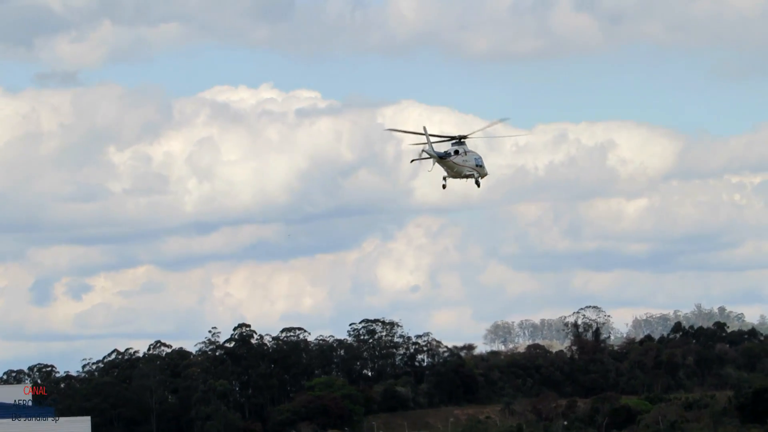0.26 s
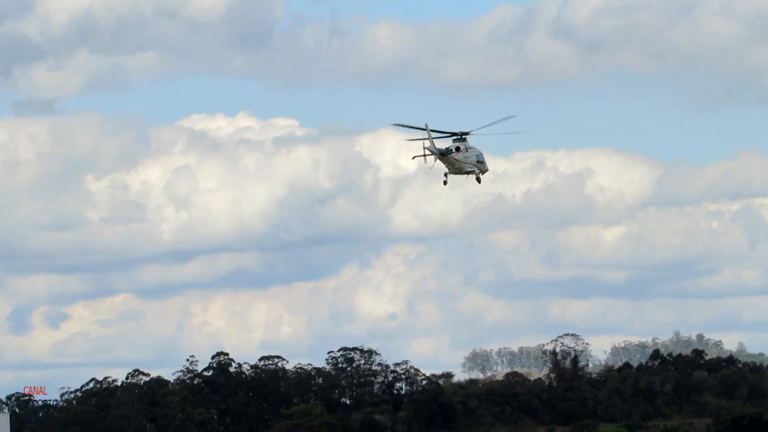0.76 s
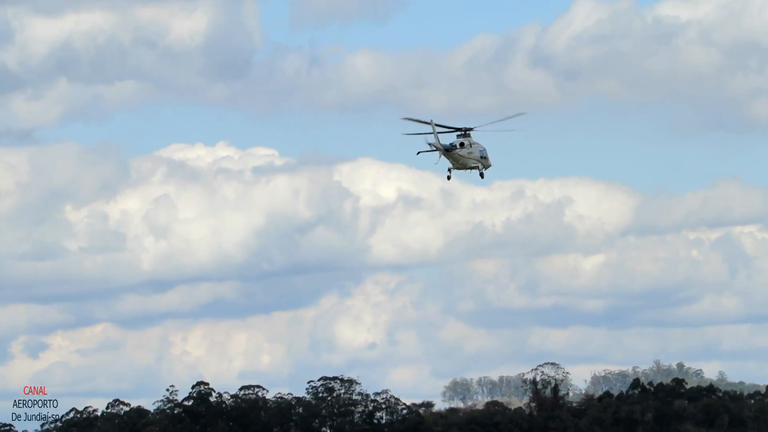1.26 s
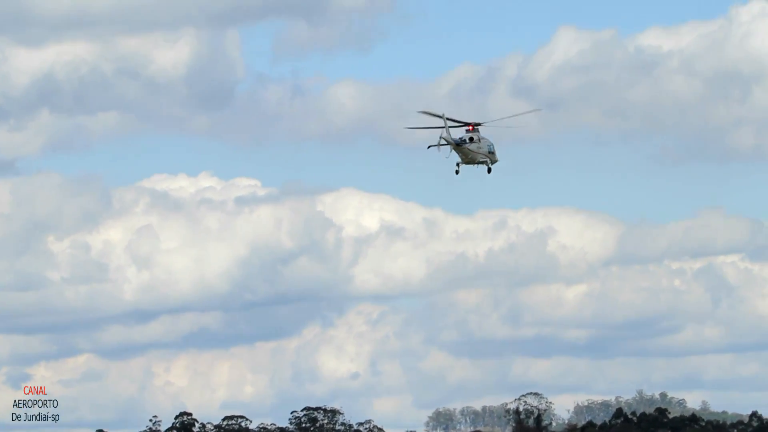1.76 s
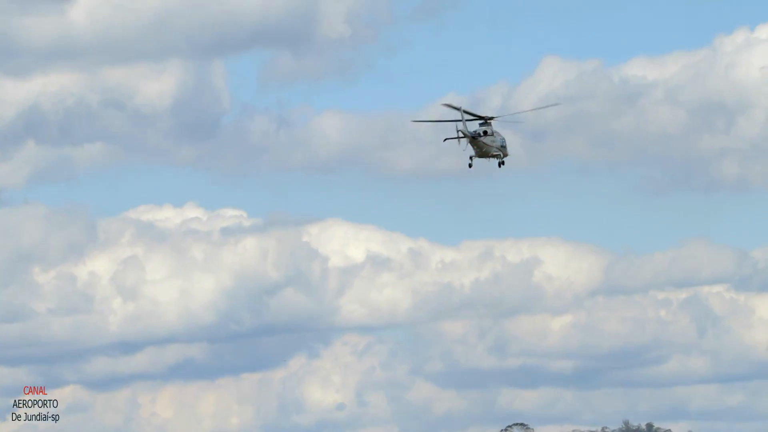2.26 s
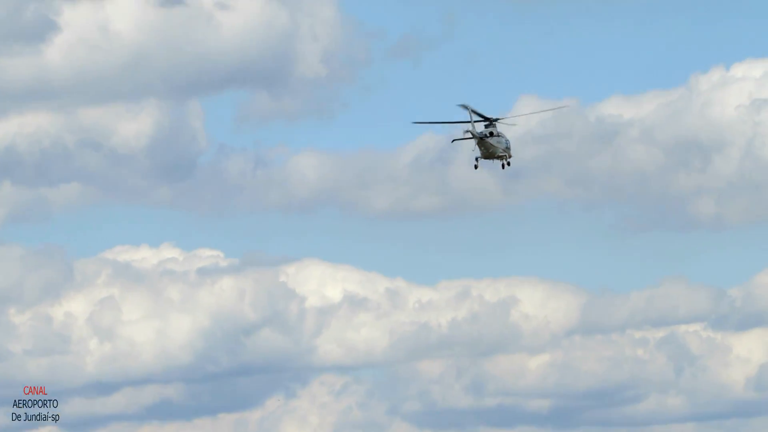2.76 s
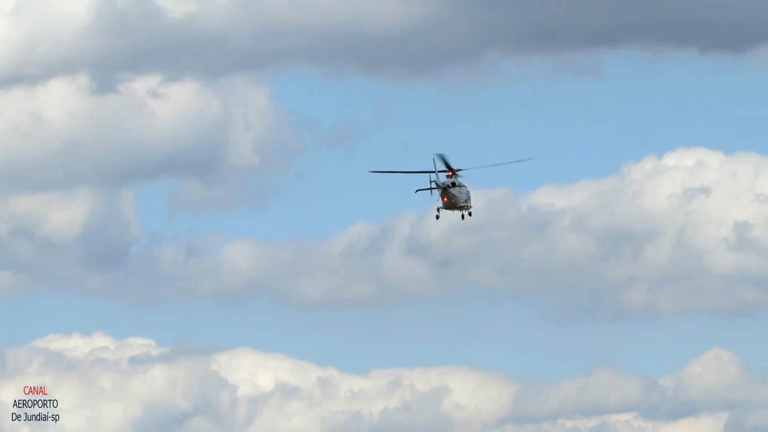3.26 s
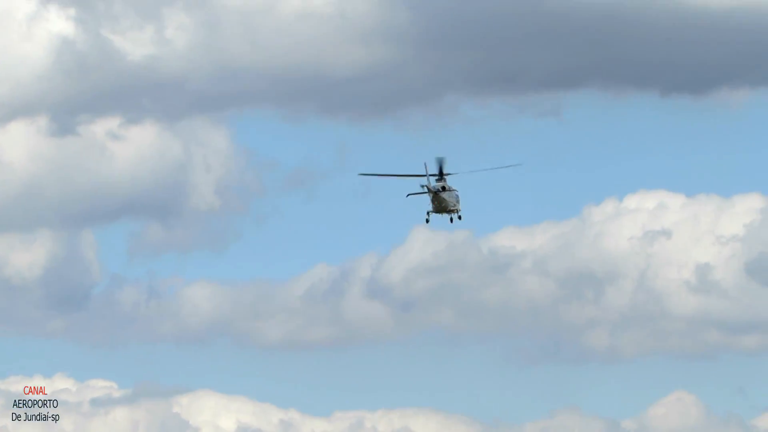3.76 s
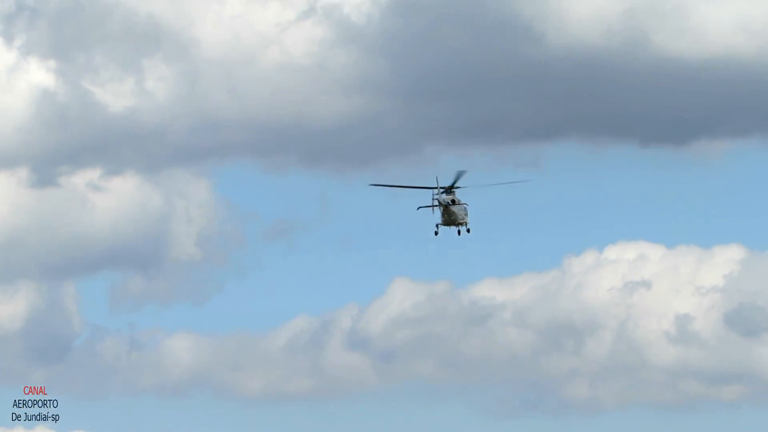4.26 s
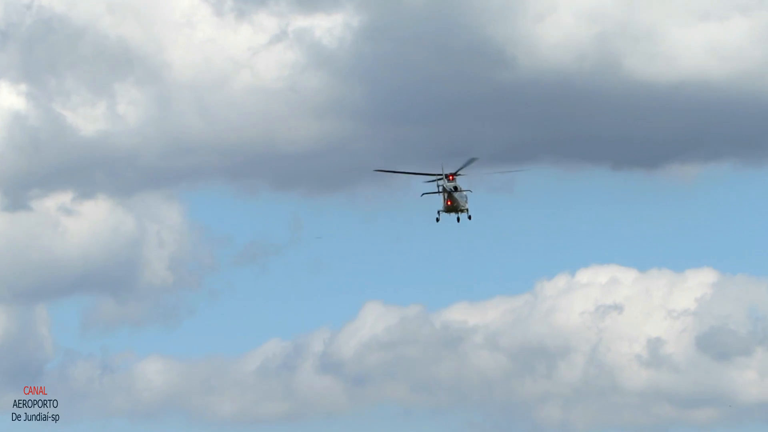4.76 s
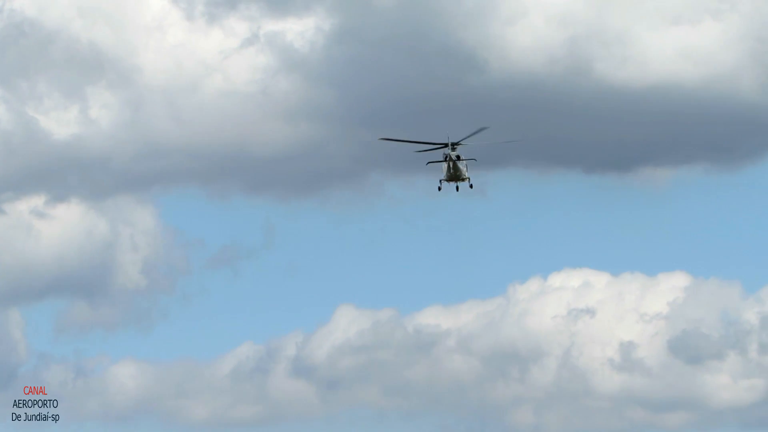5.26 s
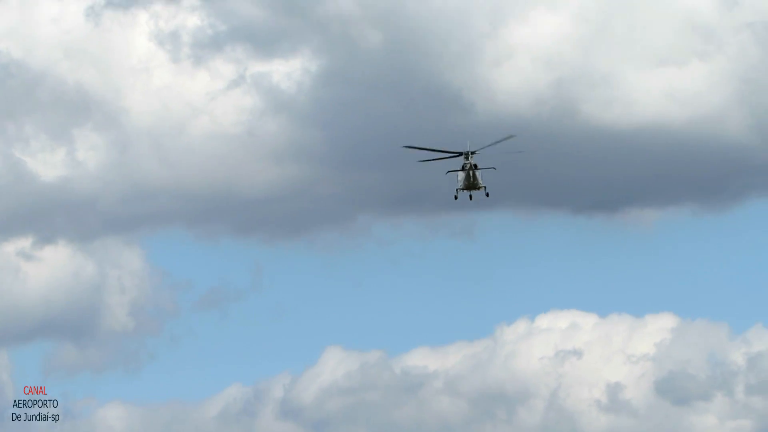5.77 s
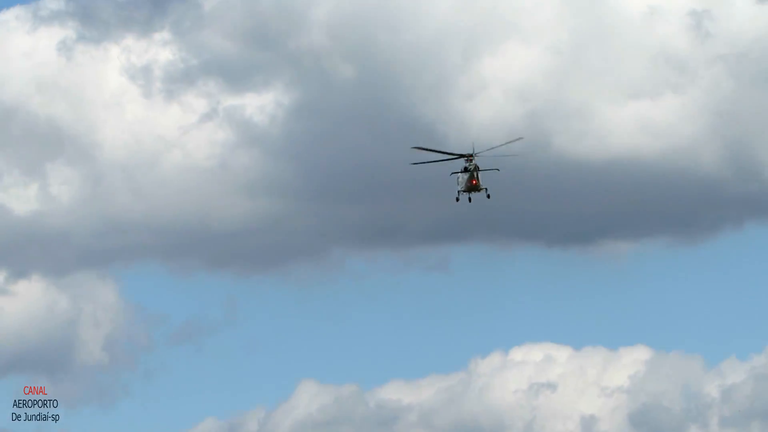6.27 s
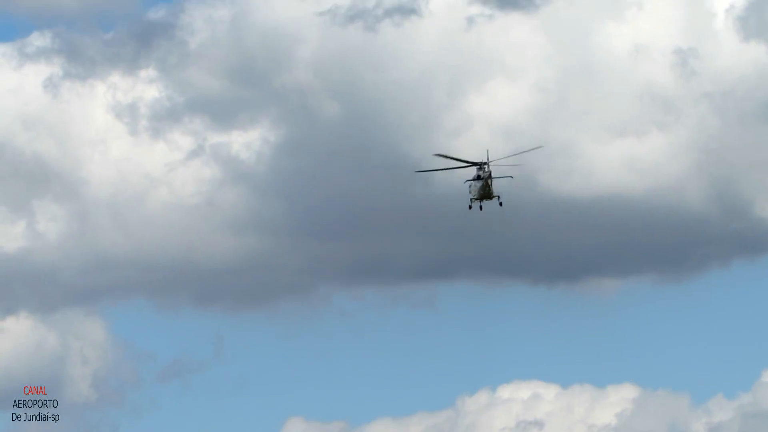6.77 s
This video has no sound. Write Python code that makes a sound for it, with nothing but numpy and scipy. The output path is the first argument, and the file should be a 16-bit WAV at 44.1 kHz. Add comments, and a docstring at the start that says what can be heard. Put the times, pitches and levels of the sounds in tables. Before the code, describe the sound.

Lumpy wind rumble dominates a camera microphone in the open, wide and restless between the ears. Ahead in the centre, a helicopter drones and flutters, with a rough airy roar, quick thumps and snapping blade slaps. The drone peaks early, the roar surges again near four seconds, then everything recedes and loses treble. Two tiny dry ticks and a late wind knock intrude.

```python
"""Airfield: a twin-turbine helicopter climbs away and turns, heard at a camera with two microphone ports in wind.
The tail rotor drones as wandering harmonics with lobes that sweep past; the main rotor thumps as filtered pulses.
Exhaust and blade wash are coloured noise chopped at both blade rates; blade slaps are short sine bursts.
Gusts are lumpy noise, mostly opposed between left and right, with head-on thuds, two dry ticks and a late
knock of wind, a sine burst like the slaps."""
import sys
import numpy as np
from scipy import signal
from scipy.fft import rfft, irfft, next_fast_len
from scipy.io import wavfile
from scipy.ndimage import uniform_filter1d, minimum_filter1d, map_coordinates

SR = 44100
rng = np.random.default_rng(int(sys.argv[2]) if len(sys.argv) > 2 else 0)


def generate_wav(signal):
    """Clip the signal to [-1, 1] and save it as 16-bit WAV at the path in sys.argv[1]."""
    frames = np.transpose(np.atleast_2d(signal))
    scaled = np.clip(frames, -1, 1) * 32767
    pcm = np.round(scaled).astype(np.int16)
    wavfile.write(sys.argv[1], SR, pcm)


N = 309572
T = np.arange(N) / SR
MAIN_HZ = 25.7  # main rotor blade passages per second


def undb(db):
    """Decibels to gain."""
    return 10 ** (np.asarray(db) / 20)


def curve(table):
    """The value columns of a time table, joined by straight lines."""
    s, *columns = np.transpose(table)
    return [np.interp(T, s, c) for c in columns]


def unit(x):
    """Scale to rms 1."""
    return x / np.sqrt(np.mean(x ** 2))


def walk(rate_hz):
    """Smooth random curve, spread about 1, that changes about rate_hz times a second."""
    coarse = T[::32]
    knots = rng.standard_normal(1024)
    smooth = map_coordinates(knots, [coarse * rate_hz], order=3, mode="wrap")
    return np.interp(T, coarse, smooth)


def bell(s, half_s):
    """A smooth rise and fall from 0 to 1 and back, centred on a moment."""
    return np.exp(-.5 * ((T - s) / half_s) ** 2)


def swelling(events):
    """Change in dB from swells that add in dB."""
    return sum(db * bell(s, half_s) for s, db, half_s in events)


def surging(rest_db, events):
    """Level in dB of a resting sound with surges that add their power to it."""
    surge_power = sum((undb(db) * bell(s, half_s)) ** 2 for s, db, half_s in events)
    return 10 * np.log10(undb(rest_db) ** 2 + surge_power)


def octave_band(x, hz):
    """Steep band-pass one octave wide, rms 1."""
    edges = [hz / np.sqrt(2), hz * np.sqrt(2)]
    return unit(signal.sosfilt(signal.butter(3, edges, "band", fs=SR, output="sos"), x))


def bands(x, spectrum, count):
    """Colour x by a spectrum and split it into overlapping bands: (centre Hz, signal), total rms about 1."""
    size = next_fast_len(N, True)
    octave = np.log2(np.maximum(np.fft.rfftfreq(size, 1 / SR), 1))
    hz, db = np.transpose(spectrum)
    gain = undb(np.interp(octave, np.log2(hz), db, left=-90, right=-120))
    coloured = rfft(unit(x), size) * unit(gain)
    centres = np.linspace(np.log2(hz[0]), np.log2(hz[-1]), count)
    split = []
    for centre, share in zip(centres, np.eye(count)):
        triangle = np.interp(octave, centres, share)
        split.append((2 ** centre, irfft(coloured * triangle)[:N]))
    return split


def above(hz, corner_hz):
    """Smooth step from 0 below a corner to 1 above it."""
    return 1 / (1 + (corner_hz / hz) ** 4)


def strokes(passages, width):
    """One smooth bump per blade passage, mean 0."""
    bump = np.exp((np.cos(2 * np.pi * passages) - 1) / width)
    return bump - bump.mean()


def stereo(mid, side):
    """Left and right from mid and side."""
    return np.array([mid + side, mid - side])


def ticks():
    """Brief dry ticks on the camera body: decaying noise plus its duller middle band, a little to the right."""
    # Each row: start in seconds, level in dB, decay in s, left minus right in dB, gain of the dull body in dB.
    tick_rows = [(3.138, -45, .0006, -3, -3), (4.7752, -36, .0011, -1, 13)]
    body_band = signal.butter(2, [2000, 6200], "band", fs=SR, output="sos")
    out = 0
    for s, db, decay_s, pan_db, body_db in tick_rows:
        envelope = (T >= s) * np.exp(-np.abs(T - s) / decay_s)
        pan_gain = undb(db + np.array([[pan_db], [-pan_db]]) / 2)
        snap = pan_gain * envelope * rng.standard_normal((2, N))
        body = signal.sosfilt(body_band, snap)
        out = out + snap + undb(body_db) * body
    return out


def thuds(low_hz=62, high_hz=125, high_db=-3):
    """Head-on gusts: short lumps of low-pressure noise in two octaves, the same in both ears."""
    # Each row: centre in seconds, peak level in dB, half length in s.
    thud_rows = [(1.5, -28, 0.02), (4.147, -22, 0.022), (4.908, -20, 0.017), (5.154, -23.5, 0.029),
                 (5.33, -25, 0.025), (6.142, -23, 0.018)]
    low = octave_band(rng.standard_normal(N), low_hz)
    high = octave_band(rng.standard_normal(N), high_hz)
    rumble = unit(low + undb(high_db) * high)
    return rumble * sum(undb(db) * bell(s, half_s) for s, db, half_s in thud_rows)


def buffeting(gust_db, eddy_db, lumpy_db=1.2, flicker_db=1, fine_db=2.0):
    """Two noise streams share lumps of pressure; the small eddies (treble) crowd into the strong lumps."""
    # Colour of the wind. Each row: frequency in Hz, relative density in dB per Hz.
    wind_colour = [(12, -25.5), (25, -7.5), (65, -3), (130, -3.5), (250, -10), (450, -16.5), (700, -25),
                   (1000, -35.5), (1600, -55.5), (3000, -72)]
    lumps = walk(80)
    out = []
    for _ in range(2):
        total = 0
        for hz, band in bands(rng.standard_normal(N), wind_colour, count=10):
            lump_db = gust_db + lumpy_db * lumps + flicker_db * walk(17)
            small_db = above(hz, 490) * (eddy_db + fine_db * lumps)
            total = total + band * undb(lump_db + small_db)
        out.append(total)
    return out


def wind(breeze_db=-24, breeze_waver_db=-2.5):
    """A gust pushes on one port while it sucks at the other; little is common to both."""
    # Each row: centre in seconds, peak level in dB, half length in s.
    gusts = [(0.008, -15.5, 0.08), (0.273, -20, 0.039), (0.387, -19, 0.02), (0.493, -14, 0.063),
             (0.673, -19, 0.049), (0.824, -15.5, 0.09), (0.928, -14.5, 0.035), (1.025, -15, 0.049),
             (1.192, -19, 0.076), (1.344, -21.5, 0.048), (1.496, -14.5, 0.031), (1.612, -20, 0.022),
             (1.966, -18, 0.11), (2.155, -17, 0.086), (2.258, -22, 0.02), (2.416, -15.0, 0.11),
             (2.583, -16, 0.056), (2.85, -13.5, 0.074), (3.085, -20.5, 0.093), (3.236, -21, 0.02),
             (3.33, -17.5, 0.054), (3.473, -10.5, 0.021), (3.592, -14.5, 0.043), (3.752, -18.5, 0.034),
             (3.997, -14.5, 0.11), (4.167, -13.5, 0.052), (4.298, -15.0, 0.056), (4.57, -14, 0.11),
             (4.722, -31, 0.022), (4.779, -17, 0.021), (4.91, -13, 0.044), (5.125, -19, 0.16),
             (5.338, -13.0, 0.053), (5.415, -13, 0.026), (5.505, -13.0, 0.037), (5.713, -14, 0.041),
             (5.796, -14, 0.022), (5.905, -26, 0.017), (5.988, -17.5, 0.13), (6.136, -15.5, 0.049),
             (6.29, -14, 0.031), (6.404, -13.5, 0.023), (6.534, -17.5, 0.072), (6.682, -17.5, 0.055),
             (6.807, -17.5, 0.042), (6.956, -20.5, 0.12)]
    # Hiss of small eddies at the port edges. Each row: time in seconds, level relative to the gust in dB.
    eddies = [(0, -13), (1.0, -3.5), (1.7, -14), (2.2, -9.5), (2.9, -3.5), (3.6, -8), (4.2, -2.5),
              (4.6, -3.5), (5.35, 2.5), (5.8, -8), (6.15, 1), (6.8, 5)]
    # Pressure alike on both ports. Each row: time in seconds, gain relative to the opposed part in dB.
    common_share = [(0, -8.5), (1.0, -9), (1.8, -10), (2.7, -9.5), (3.6, -8.5), (4.3, -10.5), (4.7, -14),
                    (5.3, -10.5), (6.4, -11.5), (7, -8)]
    gust_db = surging(breeze_db + breeze_waver_db * walk(2.2), gusts)
    opposed, common = buffeting(gust_db, curve(eddies)[0])
    return stereo(undb(curve(common_share)[0]) * common, opposed)


def turbines(near_db, waver_hz=22, flicker_db=3):
    """A faint whine: a sine whose pitch and level waver, blurred by the air it crosses."""
    # Each row: pitch in Hz, level in dB at the roar's loudest moment.
    whines = [(4355, -64)]
    out = 0
    for hz, db in whines:
        level_db = db + near_db + flicker_db * walk(7.2)
        cycles = np.cumsum(hz + waver_hz * walk(60)) / SR
        out = out + undb(level_db) * np.sin(2 * np.pi * cycles)
    return out


def wash():
    """Hollow octave-wide swells of rushing air from the rotor wake."""
    # Each row: time in seconds, band centre in Hz, peak level in dB, half length in s.
    wash_rows = [(0.2, 1830, -39.5, 0.1), (1.296, 309, -38.5, 0.26), (1.43, 1300, -43.5, 0.077),
                 (2.879, 397, -36, 0.27), (4.1, 2170, -47.5, 0.15), (6.8, 526, -40.5, 0.27)]
    out = 0
    for s, hz, db, half_s in wash_rows:
        out = out + undb(db) * bell(s, half_s) * octave_band(rng.standard_normal(N), hz)
    return out


def reflected(x):
    """Two surfaces nearby add slightly later copies: broad coloured bands that slide as the lags change."""
    # Each row of both: time in seconds, lag behind the direct sound in s, strength 0-1.
    near_echo = [(0.3, 0.0012, 0), (1.15, 0.0013, 0.27), (1.9, 0.0014, 0.01), (3.8, 0.0013, 0.07),
                 (4.2, 0.0015, 0.32), (4.7, 0.00154, 0.3), (6.1, 0.0016, 0.25), (7, 0.0017, 0.02)]
    far_echo = [(0, 0.0017, 0.084), (0.6, 0.0023, 0.064), (1.2, 0.0023, 0.15), (1.8, 0.0019, 0.044),
                (2.35, 0.0016, 0.072), (2.8, 0.0019, 0.12), (3.3, 0.0015, 0.02), (7, 0.0033, 0.011)]
    out, power = x, 1
    for lag_s, strength in (curve(near_echo), curve(far_echo)):
        out = out + strength * np.interp(T - lag_s, T, x)
        power = power + strength ** 2
    return out / np.sqrt(power)


def roar(passages, level_db, treble_db, roar_db=10.5, flicker_db=1.0, bass_follow=0.32):
    """Exhaust and blade wash: banded noise chopped by both rotors; the treble has a level course of its own."""
    # Each row: time in seconds, main rotor chop depth 0-1, tail rotor chop depth 0-1.
    chop_depths = [(0, 0.34, 0.2), (0.7, 0.18, 0.4), (1.5, 0.05, 0.1), (2.5, 0.2, 0), (3.6, 0.16, 0.3),
                   (4.1, 0.27, 0.27), (4.6, 0.42, 0.1), (5.1, 0.14, 0.25), (7, 0.03, 0.3)]
    # Second rasp in each tail blade passage. Each row: time in seconds, strength beside the first 0-1.
    second_rasp = [(0.3, 0.55), (1.1, 0.35), (3.5, 0.9)]
    # Each row: frequency in Hz, relative density in dB per Hz.
    roar_colour = [(25, -12), (50, -12), (110, -1), (300, 2), (460, -4.5), (660, -10), (780, -11.5),
                   (930, -9), (1450, -13.5), (1780, -17.5), (2350, -17.5), (3300, -28), (5000, -37),
                   (7000, -46.5), (8800, -56), (13000, -64.5), (14900, -75.5)]
    main_depth, tail_depth = curve(chop_depths)
    first = strokes(passages, width=0.13)
    second = curve(second_rasp)[0] * strokes(passages + .5, width=0.12)
    main_chop = main_depth * strokes(MAIN_HZ * T, width=0.33)
    chop = 1 + main_chop + tail_depth * (first + second)
    mean_db = level_db.mean()
    swell_db, bright_db = level_db - mean_db, treble_db - treble_db.mean()
    direct = bands(rng.standard_normal(N), roar_colour, count=16)
    scattered = bands(rng.standard_normal(N), roar_colour, count=16)
    spread_log_hz = np.log([400, 1200, 2500, 5000, 8000])
    mid = side = 0
    for (hz, direct_band), (_, scattered_band) in zip(direct, scattered):
        # the bass follows the level changes less
        follow = bass_follow + (1 - bass_follow) * above(hz, 460) - 0.1 * above(hz, 7600)
        course_db = follow * swell_db + bright_db * above(hz, 1800)
        gain = undb(mean_db + roar_db + course_db + flicker_db * walk(9))
        # the ports hear more unlike sound towards the treble
        spread_db = np.interp(np.log(hz), spread_log_hz, [-17.5, -11.0, -10, -4.0, -1.0])
        mid = mid + gain * direct_band
        side = side + gain * undb(spread_db) * scattered_band
    return stereo(reflected(mid * chop), side * chop)


def main_rotor(near_db, thump_db=-35.5, recede=1.0, body_hz=56, edge_hz=250, edge_db=-2, uneven_db=3):
    """Each blade passage sends one uneven pressure pulse, softened to two octaves; it weakens with distance."""
    pulses = np.diff(np.floor(MAIN_HZ * T), prepend=0) * undb(uneven_db * walk(29))
    thump = octave_band(pulses, body_hz) + undb(edge_db) * octave_band(pulses, edge_hz)
    return thump * undb(thump_db + recede * near_db)


def slaps_and_knock(passages, level_db, scatter_db=1.5, jitter_s=0.0007, slap_hz=1050, length_s=0.00037):
    """Short sine bursts: hard blade slaps, a faint rattle on the tail beat, a knock of wind on the microphone."""
    # Hard slaps, and at 6.131 s the knock of wind.
    # Each row: start in seconds, burst envelope peak in dB, pitch in Hz.
    hard = [(0.543, -19, 900), (0.859, -16.3, 850), (1.060, -13.8, 1200), (1.130, -18.5, 1100),
            (1.271, -21, 1000), (1.386, -20, 1200), (1.995, -20.5, 900), (2.928, -20, 750),
            (3.343, -24, 1350), (3.662, -22.5, 900), (3.703, -19, 750), (3.890, -21.5, 1100),
            (3.998, -19.5, 1000), (4.084, -15.5, 850), (4.163, -22, 1700), (4.322, -22.5, 1600),
            (4.435, -20.5, 750), (6.131, -22.5, 700)]
    # Tail blades cutting their own wake. Each row: time in seconds, envelope peak in dB above level_db.
    rattle = [(0, -7), (0.3, 4), (0.52, 5.5), (0.7, 8), (0.9, 7), (1.1, 10), (1.45, 13), (1.75, -0.5),
              (2.5, -3.5), (7, -4.5)]
    beats = np.flatnonzero(np.diff(np.floor(passages)))
    chance = np.clip(rng.standard_normal(len(beats)), -2, 2)
    pitches_hz = slap_hz * 2 ** (0.2 * rng.standard_normal(len(beats)))
    times_s = T[beats] + jitter_s * rng.standard_normal(len(beats))
    peaks_db = (level_db + curve(rattle)[0])[beats] + scatter_db * chance
    out = np.zeros(N)
    for s, db, pitch_hz in [*hard, *zip(times_s, peaks_db, pitches_hz)]:
        span = slice(max(int((s - .01) * SR), 0), int((s + .01) * SR))
        age = T[span] - s - length_s
        envelope = np.exp(-.5 * (age / length_s) ** 2)
        out[span] += undb(db) * envelope * np.sin(2 * np.pi * pitch_hz * age)
    return out


def tail_rotor(passages, near_db, recede=0.71, waver_db=0.73, wander_rad=0.12):
    """Blade-pass harmonics, the third a loud drone; turbulent air makes each fade and wander on its own."""
    # Each row: harmonic multiple, level between lobes in dB at the roar's loudest moment.
    orders = [(1, -34), (2, -42.5), (3, -30), (4, -43), (5, -48), (6, -43), (7, -45.5), (8, -47),
              (9, -46.5), (13, -49), (14, -53.5)]
    # Harmonics beaming past as the tail swings.
    # Each row: multiple, time in seconds, peak in dB, half length in s.
    lobe_rows = [(1, 0.33, -29, 0.15), (2, 0.32, -30, 0.09), (5, 0.3, -31.5, 0.42), (3, 0.26, -27, 1),
                 (4, 0.33, -37, 0.27), (14, 1.05, -43, 0.35), (2, 0.7, -27, 0.1), (1, 0.66, -29.5, 0.071),
                 (1, 1.3, -34, 0.33), (3, 1.55, -23.5, 0.35), (5, 1.6, -50.5, 0.24), (2, 1.72, -34.5, 0.19),
                 (3, 2.21, -17.5, 0.33), (2, 2.41, -29, 0.12), (1, 2.56, -30.5, 0.071),
                 (3, 2.84, -21, 0.35), (1, 2.92, -34.5, 0.065), (2, 3.1, -28, 0.13), (5, 3.25, -39, 0.46),
                 (2, 3.2, -33.5, 0.14), (3, 3.75, -24, 0.37), (3, 4.54, -27.5, 0.23), (3, 5.5, -33, 0.98),
                 (1, 6.2, -40, 0.13), (2, 7.02, -30.5, 0.43)]
    out = 0
    for k, rest_db in orders:
        fade_db = 0.6 * np.sqrt(k)
        lobes = [lobe for multiple, *lobe in lobe_rows if multiple == k]
        faded_db = rest_db + recede * near_db + fade_db * walk(3.3)
        db = surging(faded_db, lobes) + waver_db * walk(8.3)
        phase = 2 * np.pi * (k * passages + rng.random()) + wander_rad * np.sqrt(k) * walk(7.9)
        out = out + undb(db) * np.sin(phase)
    return np.sqrt(2) * out  # levels are rms


def scene(start_db=-32.5, recede_per_s=0.44):
    """Helicopter straight ahead, its distance growing by recede_per_s of the first each second; wind around."""
    # Swells and sags through the moving air. Each row: centre in seconds, change in dB, half length in s.
    swells = [(0.4, 2.5, 0.29), (1.3, -1, 0.18), (2.22, 2.5, 0.14), (2.9, 0.3, 0.076), (3.47, -3, 0.11),
              (4.04, 5, 0.17), (4.75, 3, 0.21), (5.22, 1.5, 0.14), (5.9, -1.5, 0.54)]
    # Treble of the roar, used for its course only. Each row: time in seconds, level in dB.
    treble = [(0, -37.5), (0.27, -37.5), (0.9, -41.5), (2.3, -40.5), (2.95, -41.5), (3.4, -44.5),
              (4.08, -42.5), (4.75, -43), (5.1, -47), (5.75, -47.5), (6.4, -52.5), (7.02, -47.5)]
    # Each row: time in seconds, tail rotor blade-pass rate in Hz.
    tail_rate = [(0, 70.05), (1.1, 69.59), (3.7, 70.21), (4.4, 69.73), (7.0, 69.87)]
    level_db = start_db - 20 * np.log10(1 + recede_per_s * T) + swelling(swells)
    treble_db = curve(treble)[0] - level_db
    near_db = level_db - level_db.max()
    passages = np.cumsum(curve(tail_rate)[0]) / SR
    air = ticks() + thuds() + wind()
    engines = turbines(near_db) + wash() + roar(passages, level_db, treble_db)
    bursts = slaps_and_knock(passages, level_db)
    return air + engines + main_rotor(near_db) + bursts + tail_rotor(passages, near_db)


def limiter(x, ceiling=.97, size=441):
    """Turn both channels down smoothly round any peak that would pass the ceiling; size in samples."""
    allowed = ceiling / np.maximum(np.abs(x).max(axis=0), ceiling)
    gain = minimum_filter1d(allowed, 2 * size)
    return x * uniform_filter1d(uniform_filter1d(gain, size), size)


def record(dry, open_s=.003, top_hz=14900):
    """A short fade-in, the camera's two narrow notch filters, a peak limiter and a steep low-pass."""
    # Each row: notch centre in Hz, width in Hz, depth 0-1.
    notches = [(3927, 360, 1), (7950, 730, 0.6)]
    dry = dry * np.sin(np.pi / 2 * np.minimum(T / open_s, 1)) ** 2
    for hz, width_hz, depth in notches:
        peak = signal.iirpeak(hz, hz / width_hz, fs=SR)
        dry = dry - depth * signal.lfilter(*peak, dry)
    low_pass = signal.ellip(8, .2, 70, top_hz, fs=SR, output="sos")
    return signal.sosfilt(low_pass, limiter(dry))


dry = scene()
out = record(dry)
generate_wav(out)
```